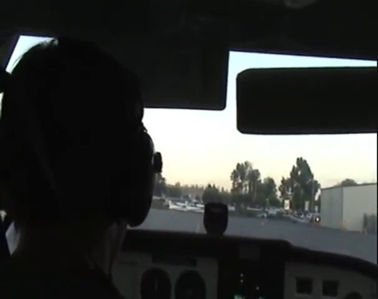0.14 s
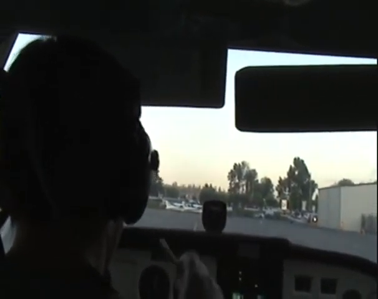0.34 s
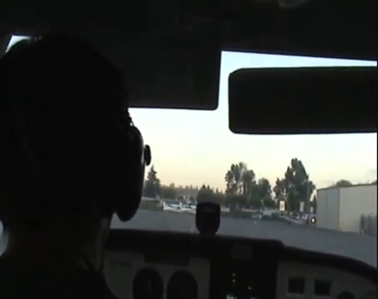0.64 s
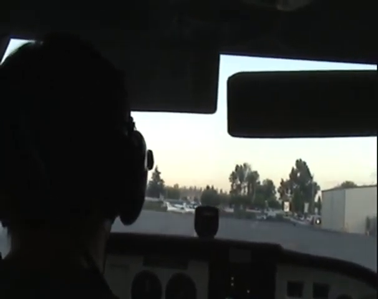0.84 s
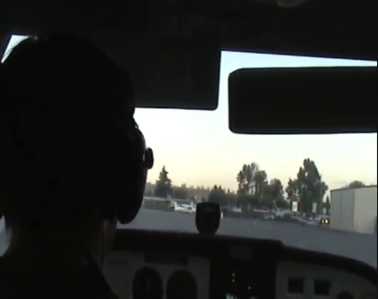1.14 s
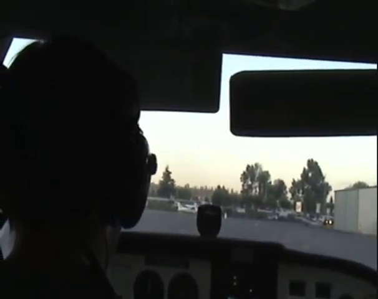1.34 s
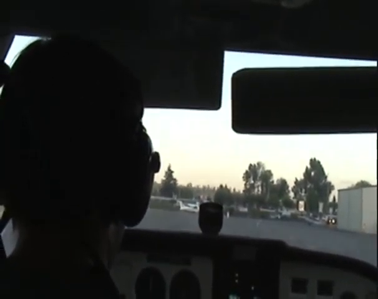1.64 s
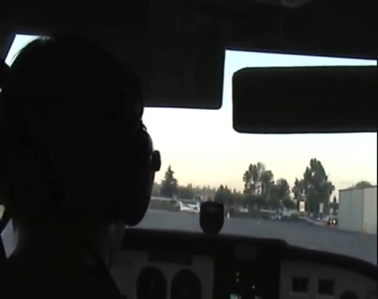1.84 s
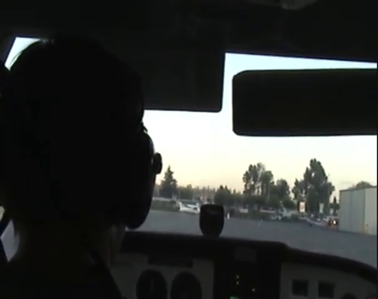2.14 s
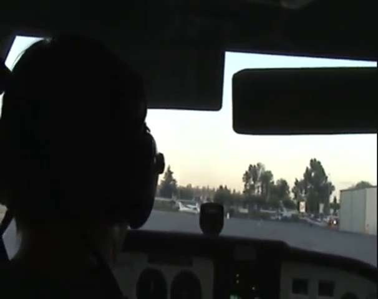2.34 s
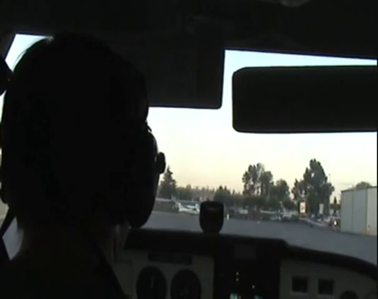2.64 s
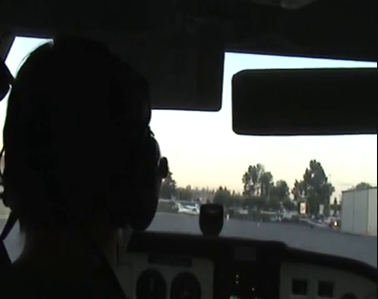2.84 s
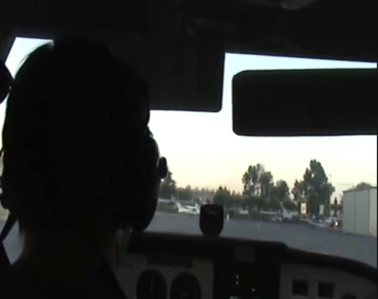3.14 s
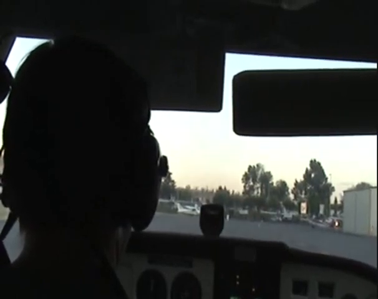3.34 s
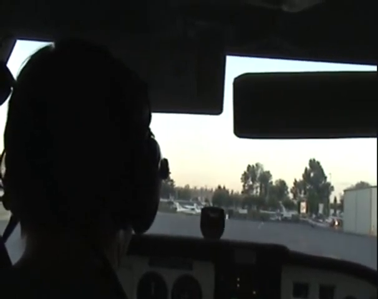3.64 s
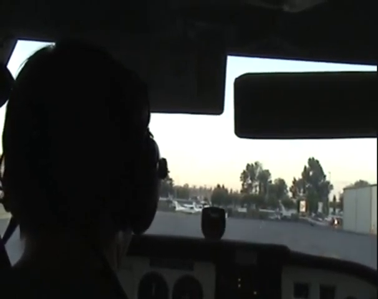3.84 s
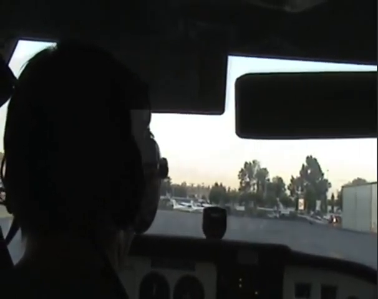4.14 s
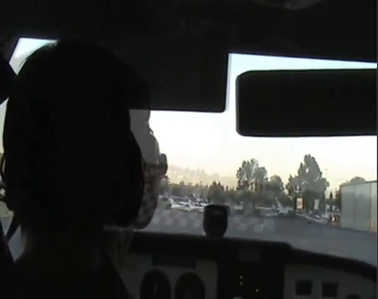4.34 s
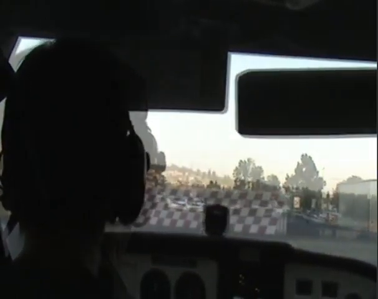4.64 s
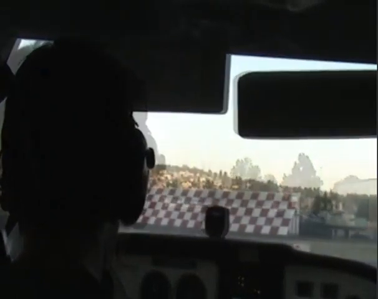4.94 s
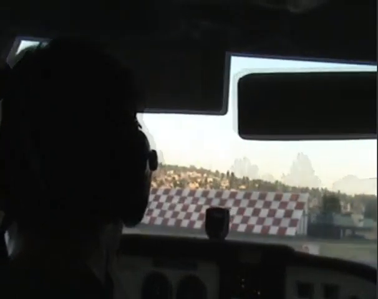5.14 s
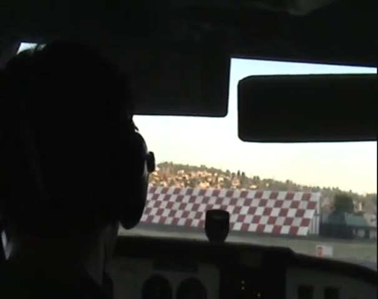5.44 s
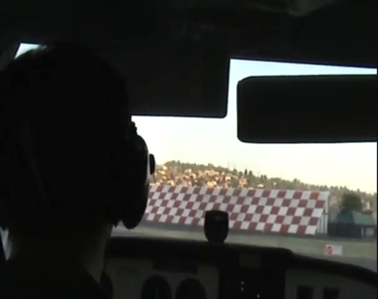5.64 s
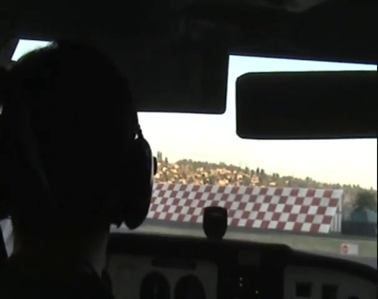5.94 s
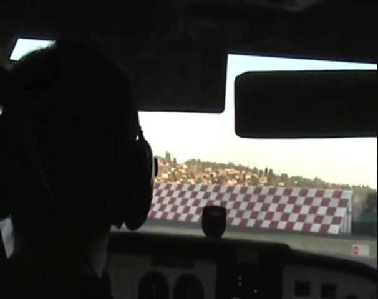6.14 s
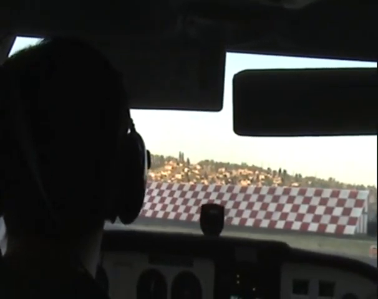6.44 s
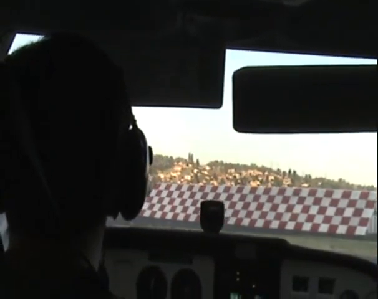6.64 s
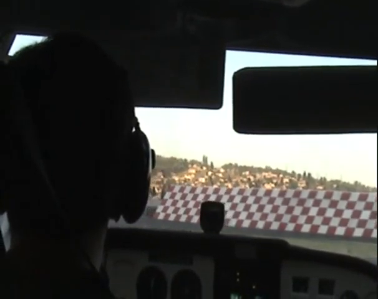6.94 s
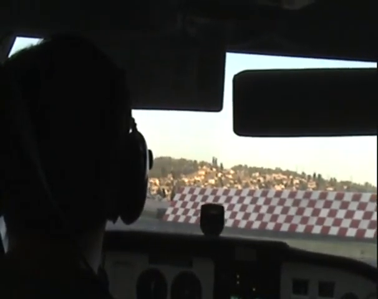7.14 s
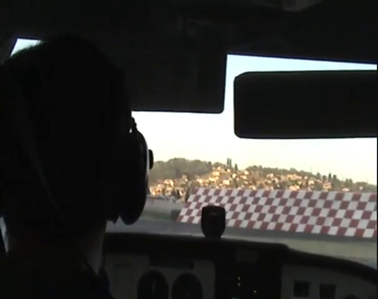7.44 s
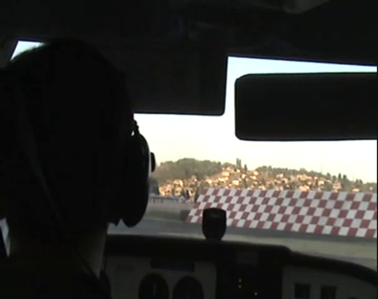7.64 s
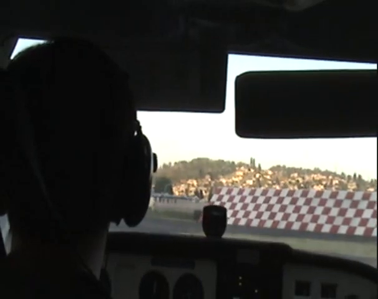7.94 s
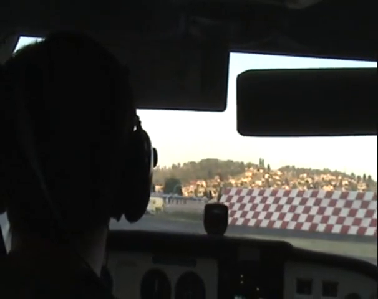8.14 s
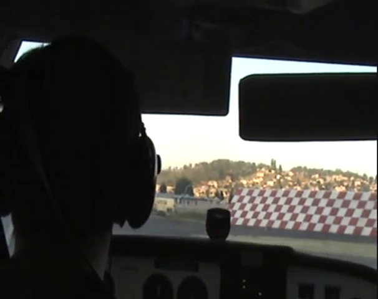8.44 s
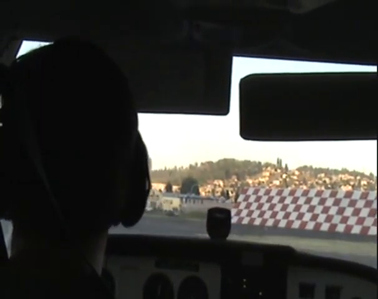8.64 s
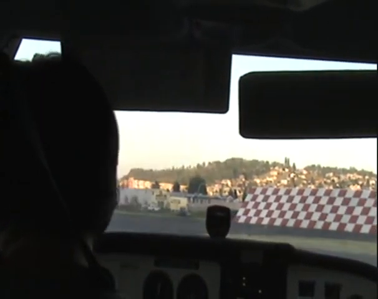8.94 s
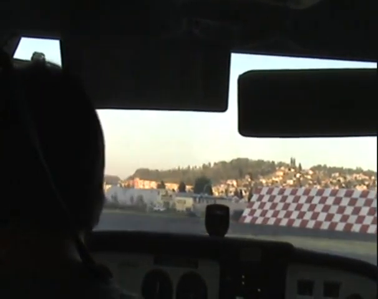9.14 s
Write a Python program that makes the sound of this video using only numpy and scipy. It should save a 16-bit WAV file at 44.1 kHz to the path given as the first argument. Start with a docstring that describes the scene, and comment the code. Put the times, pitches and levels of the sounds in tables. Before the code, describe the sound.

Heard from inside a small airplane cabin on the ground: a four-cylinder engine idles in a smooth low purr over muffled air noise, with faint ticking fittings and a few tiny squeaks. Just after four seconds it gradually dissolves into higher power, a deep lumpy throb with louder gusting propeller wash, a thin high whine and harder metallic clacks, continuing to the end without a fade.

```python
"""Inside the cabin of a small four-cylinder airplane on the ground. The engine first idles smoothly: summed
exhaust tones over shaped noise, with light fitting ticks and a few squeaks. From about 4 s it dissolves into
the engine at higher power: a lumpy beat, louder gusting propeller wash and a thin whine of steady tones.
One beat fails at about 6.5 s and one at about 9.1 s. Hard clacks, ringing noise bursts, fall throughout but
mostly at power; a few more sine squeaks follow."""
import sys
import numpy as np
from scipy import signal
from scipy.fft import rfft, irfft
from scipy.io import wavfile

SR = 44100
rng = np.random.default_rng(int(sys.argv[2]) if len(sys.argv) > 2 else 0)


def bounce(signal):
    """Save signal as a 16-bit WAV file at the path given by the first command-line argument."""
    frames = np.transpose(np.atleast_2d(signal))
    limited = np.clip(frames, -1, 1)
    pcm = np.round(limited * 32767).astype(np.int16)
    wavfile.write(sys.argv[1], SR, pcm)


N = 410130
TIME = np.arange(N) / SR
BINS = np.fft.rfftfreq(N, 1 / SR)


def amp(db):
    """Decibels to gain."""
    return 10 ** (np.asarray(db) / 20)


def evened(x):
    """Scales to rms 1."""
    return x / np.sqrt(np.mean(x ** 2) + 1e-20)


def curve(points):
    """Joins rows (s, value) by straight lines over time."""
    return np.interp(TIME, *np.transpose(points))


def spectrum(points):
    """Joins rows (Hz, value) on a log-frequency axis."""
    hz, value = np.transpose(points)
    return np.interp(np.log(BINS + 1), np.log(hz + 1), value)


def wander(rate_hz, size=16384):
    """Slow random signal of rms 1, low-passed around rate_hz."""
    hz = np.fft.rfftfreq(size, N / SR / size)
    lowpass = 1 / (1 + (hz / rate_hz) ** 4)
    slow = irfft(rfft(rng.standard_normal(size)) * lowpass)
    return np.interp(np.arange(N) * size / N, np.arange(size), evened(slow))


def add(mix, start_s, sound):
    """Adds a sound into the mix at a time."""
    part = mix[max(round(start_s * SR), 0):][:len(sound)]
    part += sound[:len(part)]


# Engine speed at idle. Each row: time in seconds, speed in revolutions per minute.
IDLE_RPM = [(0.0, 1286.8), (5.3, 1295.2)]
# Exhaust and propeller tones. Each row: multiple of the four-stroke cycle (4 = firing rate), nominal peak in dB.
IDLE_ORDERS = [(2, -46), (3, -40), (4, -26), (5, -46), (6, -64), (7, -44), (8, -20.5), (9, -60),
               (11, -47.5), (12, -22.5), (16, -36.5), (20, -48), (24, -47.5)]
# Roar through the cabin walls. Each row: frequency in Hz, relative spectral level in dB.
IDLE_ROAR = [(15, 4), (60, 10.5), (170, 7.5), (240, -1.5), (300, 0), (340, -3), (470, 0.5), (620, -0.5),
             (740, -9), (1300, -14), (2200, -20), (4000, -26.5), (7000, -30), (10800, -29.5),
             (15500, -41.5)]
# Cylinders. Each row: place in the cycle (0-1), relative knock in dB, puff of roar (0-1).
IDLE_CYLINDERS = [(.19, -1, 0.34), (.43, 3, 0.6), (.68, 2.5, 0), (.94, -1, 0.3)]


def idling():
    """Smooth four-cylinder beat, wash and light ticks at low engine speed."""
    cycles = crank(IDLE_RPM, start_cycles=.022)
    beat = exhaust(cycles, IDLE_ORDERS, uneven=0.02, blade=0.52, blade_lead_cycles=0.095)
    puffs = puffing(cycles, IDLE_CYLINDERS, lag_cycles=0.041)
    wash = roar(cycles, IDLE_ROAR, puffs, level_db=-34.5, throb=0.054, gust_db=0.92,
                flutter_db=0.87, machinery=0.63, ring=1.28)
    ticks = rattle(cycles, IDLE_CYLINDERS, level_db=-59.0, spread_db=2.5, decay_s=0.0023, tilt_db=-2.5)
    hits = loose_part(cycles, place=.42, top_db=-38, range_db=19, ring_hz=4810, scatter=0.063)
    return beat + wash + ticks + clacks(hits, level_db=-17, dry=.3)


# Engine speed under power. Each row: time in seconds, speed in revolutions per minute.
POWER_RPM = [(4.5, 1673.1), (5.3, 1721.5), (7.0, 1650.8), (7.5, 1671.5), (8.0, 1700.3), (8.7, 1682.0),
             (9.3, 1620.9)]
# Exhaust and propeller tones. Each row: multiple of the four-stroke cycle (4 = firing rate), nominal peak in dB.
POWER_ORDERS = [(2, -62), (3, -66), (4, -12), (5, -35), (6, -15), (7, -38), (8, -17), (10, -25),
                (12, -35.5), (14, -36.5)]
# Roar through the cabin walls. Each row: frequency in Hz, relative spectral level in dB.
POWER_ROAR = [(15, 4), (60, 14), (190, 1.5), (270, -1.5), (335, -5.5), (410, 1), (520, 0.5), (720, -7),
              (1300, -14.5), (2500, -22), (5000, -30), (7000, -32.5), (10800, -30.5), (15500, -41)]
# Cylinders. Each row: place in the cycle (0-1), relative knock in dB, puff of roar (0-1).
POWER_CYLINDERS = [(.16, -14, 0), (.41, -1.5, 0.2), (.65, -18, 0.16), (.9, 1.5, 0.06)]
WASH_DB_PER_RPM = 0.011  # a faster propeller blows harder


def powered(recovery=0.59, recovery_rpm=50, even_rpm=1675):
    """Strong and weak firings alternate; the strong ones shake the fittings most."""
    cycles = crank(POWER_RPM, start_cycles=-.054)
    excess_rpm = curve(POWER_RPM) - even_rpm
    # weak cylinders pull harder above even_rpm, less below it
    on_weak = np.sin(2 * np.pi * cycles) ** 2
    strength = (1 + recovery * on_weak * np.tanh(excess_rpm / recovery_rpm)) * misfire()
    beat = exhaust(cycles, POWER_ORDERS, uneven=0.035, blade=0.905, blade_lead_cycles=0.0424) * strength
    puffs = puffing(cycles, POWER_CYLINDERS, lag_cycles=0.064)
    wash = roar(cycles, POWER_ROAR, puffs, level_db=-25.0, throb=0.04, gust_db=0.83,
                flutter_db=1.5, machinery=0.47, ring=0.89)
    wash = wash * amp(WASH_DB_PER_RPM * excess_rpm)
    ticks = rattle(cycles, POWER_CYLINDERS, level_db=-49.0, spread_db=4.0, decay_s=0.0024, tilt_db=-4.5)
    hits = loose_part(cycles, place=0.33, top_db=-30, range_db=23, ring_hz=7160, scatter=0.103)
    knocks = clacks(hits, level_db=-20, dry=.3)
    return beat + wash + ticks + knocks + whine(level_db=0.5, drift_hz=4.44, flicker=0.42)


def crank(rpm, start_cycles):
    """Running count of four-stroke cycles; each takes two revolutions."""
    return np.cumsum(curve(rpm)) / (2 * 60 * SR) - start_cycles


def once_a_cycle(cycles, place):
    """Times in seconds at which the crank passes one place in its cycle."""
    return np.interp(np.arange(int(cycles[-1])) + place, cycles, TIME)


def exhaust(cycles, orders, uneven, blade, blade_lead_cycles):
    """Harmonics of the cycle; a blade thump ahead of each firing shifts phases, and strength wavers."""
    beat = np.zeros(N)
    for order, db in orders:
        turn = 2 * np.pi * round(order)
        passing = round(order) % 4 == 0  # two blades pass four times a cycle
        advance = np.angle(1 + passing * blade * np.exp(1j * turn * blade_lead_cycles))
        beat += amp(db) * np.cos(turn * cycles + advance)
    return beat * (1 + uneven * wander(47))


# Strong beats that fail. Each row: time in seconds, share of the beat lost at that time (0-1).
MISFIRES = [(6.53, 0.57), (9.110, 0.49)]


def misfire(length_s=0.014):
    """Gain on the exhaust beat: a Gaussian dip for each failed firing."""
    return 1 - sum(lost * np.exp(-((TIME - s) / length_s) ** 2) for s, lost in MISFIRES)


# Cabin and panel resonances. Each row: frequency in Hz, width in Hz, gain in dB before the ring factor.
CABIN = [(410, 37, 1.5), (510, 25, 1), (863, 80, 5), (956, 65, -1.5), (1121, 137, 7), (1188, 59, -6),
         (1410, 40, 0.5), (1636, 64, 3), (1870, 25, -0.5), (2120, 48, -0.5), (3820, 120, 3)]
# Stereo width. Each row: frequency in Hz, gain of the side signal in dB.
SIDE_GAIN = [(60, -12), (130, -13.5), (380, -21.5), (700, -17.5), (1300, -19), (2400, -15.5), (4400, -24.5),
             (8100, -9.5), (11000, -7.5), (15000, 2)]
# Stereo balance. Each row: frequency in Hz, left over right gain in dB.
LEFT_LEAN = [(350, 0.5), (700, .5), (2400, 0.4), (5000, -0.5), (9000, .9), (15000, 2)]


def roar(cycles, colour, puffs, level_db, throb, gust_db, flutter_db, machinery, ring,
         gust_low_hz=260, gust_top_hz=2600):
    """Turbulence and engine clatter swell at each firing and in gusts, coloured by the cabin."""
    swell = 1 + throb * np.cos(2 * np.pi * 4 * cycles)
    noise = rng.standard_normal((2, N))
    noise[0] += machinery * clatter(cycles)  # machinery is in the mid signal only
    air = noise * swell
    surge = evened(puffs * amp(gusting(gust_db) + flutter_db * wander(47)))
    # surges move the body of the roar, hardly its rumble or hiss
    body = BINS ** 2 / (BINS ** 2 + gust_low_hz ** 2) / (1 + (BINS / gust_top_hz) ** 2)
    mid, side = body * rfft(air * surge) + (1 - body) * rfft(air)
    side = side * amp(spectrum(SIDE_GAIN))
    ears = np.array([mid + side, mid - side]) * amp(np.outer([.5, -.5], spectrum(LEFT_LEAN)))
    cabin_db = ring * sum(db / (1 + (2 * (BINS - hz) / width) ** 2) for hz, width, db in CABIN)
    coloured = irfft(ears * amp(spectrum(colour) + cabin_db), N)
    return amp(level_db) * evened(coloured)


PUFF_CYCLES = 0.063  # Gaussian half length, to 1/e


def puffing(cycles, cylinders, lag_cycles):
    """Gain on the roar: each cylinder adds its own puff, a share of a cycle after its knock."""
    gain = 1
    for place, _, puff in cylinders:
        offset = (cycles - place - lag_cycles + .5) % 1 - .5
        gain = gain + puff * np.exp(-(offset / PUFF_CYCLES) ** 2)
    return gain


# Brief surges of propeller wash. Each row: time in seconds, relative level in dB.
SURGES = [(5.73, 3), (6.6, 2.5), (7.17, 2.2), (7.48, 3.5), (7.9, -0.2), (8.45, 1.5), (9.19, 4.5)]
SURGE_S, GUST_RATE_HZ = 0.054, 6.5  # Gaussian half length to 1/e, gust low-pass


def gusting(gust_db):
    """Relative wash level in dB: slow random gusts and a few brief surges."""
    surges_db = sum(db * np.exp(-((TIME - s) / SURGE_S) ** 2) for s, db in SURGES)
    return gust_db * wander(GUST_RATE_HZ) + surges_db


def clatter(cycles, size=4096):
    """Valves and gears: one stretch of noise repeated every cycle."""
    return evened(np.interp(cycles % 1, np.arange(size) / size, rng.standard_normal(size)))


def rattle(cycles, cylinders, level_db, spread_db, decay_s, tilt_db):
    """Each cylinder shakes the airframe and knocks its fittings once a cycle."""
    contacts = np.zeros(N)
    for place, knock_db, _ in cylinders:
        times = once_a_cycle(cycles, place)
        for s, (size, late) in zip(times, rng.standard_normal((len(times), 2))):
            hit_db = level_db + knock_db + spread_db * min(size, 1.5)
            add(contacts, s + 0.0016 * late, amp(hit_db) * chatter(decay_s))
    return fittings(contacts, tilt_db)


def chatter(decay_s, tail=0.29, tail_s=0.02):
    """Noise burst of rapid metal contacts with a short cabin echo."""
    t = np.arange(SR // 20) / SR
    strike = (t / decay_s) * np.exp(1 - t / decay_s)
    return rng.standard_normal(len(t)) * (strike + tail * np.exp(-t / tail_s))


# Resonances of the loose fittings. Each row: frequency in Hz, width in Hz, relative gain in dB before the tilt.
FITTINGS = [(5000, 94, -8), (6170, 6100, -6.5), (7270, 180, -1), (7650, 450, -11), (8700, 450, -6.5),
            (11000, 4000, -23)]


def fittings(contacts, tilt_db):
    """Contacts excite the resonances of the loose fittings; tilt_db is per octave, flat below 3 kHz."""
    ring = 0
    for hz, width, db in FITTINGS:
        ring = ring + amp(db) / (1 + 2j * (BINS - hz) / width) * BINS / (BINS + hz) * 2
    ring = ring * amp(tilt_db * np.log2(np.maximum(BINS, 3000) / 7000))
    return irfft(rfft(contacts) * ring / np.sqrt(np.mean(abs(ring) ** 2)), N)


def loose_part(cycles, place, top_db, range_db, ring_hz, scatter):
    """A part thrown once a revolution, mostly gently, at times hard: rows (s, nominal dB, ring Hz)."""
    times = np.append(once_a_cycle(cycles, place), once_a_cycle(cycles, place + .5))
    gentle, detune = rng.random((len(times), 2)).T
    hit_db = top_db - range_db * np.sqrt(gentle)
    return np.transpose([times, hit_db, ring_hz * (1 + scatter * detune ** 4)])


def clacks(hits, level_db=-12.0, decay_s=0.002, dry=0.63, ring_db=0, ring_s=0.0051):
    """Harder knocks: a bare click, the fittings at large, and one part that rings out."""
    contacts, rings, t = np.zeros(N), np.zeros(N), np.arange(SR // 20) / SR
    build_and_die = np.exp(-t / ring_s) - np.exp(-t / decay_s)
    for s, db, hz in hits:
        add(contacts, s, amp(db + level_db) * chatter(decay_s))
        add(rings, s, amp(db + ring_db) * build_and_die * np.sin(2 * np.pi * hz * t))
    return fittings(contacts, tilt_db=-2) + dry * contacts + rings


# Whine, likely of gyro instruments. Each row: frequency in Hz, rms level in dB before level_db and panning.
WHINE = [(3548, -63), (3628, -62.5), (3671, -63), (3973, -67), (4151, -66), (3870, -72)]


def whine(level_db, drift_hz, flicker):
    """High sines wavering in pitch and level, leaning alternately left and right."""
    out = np.zeros((2, N))
    for k, (hz, db) in enumerate(WHINE):
        phase = 2 * np.pi * np.cumsum(hz + drift_hz * wander(11.4)) / SR
        tone = (1 + flicker * wander(21)) * np.sin(phase)
        pan_db = (-1) ** k * 1.2 * np.array([1, -1])
        out += np.outer(amp(db + pan_db), tone)
    return amp(level_db) * np.sqrt(2) * out


# Thin squeaks. Each row: start in seconds, centre frequency in Hz, peak level in dB.
SQUEAKS = [(.85, 11100, -55), (.92, 11100, -54), (1.358, 2650, -53), (1.483, 2040, -53), (3.49, 11100, -54),
           (4.06, 5400, -57), (6.908, 14150, -47), (7.148, 14150, -42), (7.608, 11000, -44)]
SQUEAK_S = 0.044


def squeaks(waver_hz=45):
    """Brief, faint, high sines of unsteady pitch with smooth ends."""
    out, waver = np.zeros(N), waver_hz * wander(150)
    for s, hz, db in SQUEAKS:
        pitch = hz + waver[round(s * SR):][:round(SQUEAK_S * SR)]
        envelope = signal.windows.tukey(len(pitch), .7)
        add(out, s, amp(db) * envelope * np.sin(2 * np.pi * np.cumsum(pitch) / SR))
    return out


# Fade from idle to power. One row: start in seconds, end in seconds.
DISSOLVE = (4.145, 5.46)
# The loudest rattles. Each row: time in seconds, nominal level in dB, ring frequency in Hz.
CLACKS = [(2.4622, -41, 4930), (2.6468, -43, 4840), (4.7925, -40, 7220), (5.3531, -36, 7230),
          (5.4599, -37, 9060), (6.2002, -35, 7220), (6.4846, -36, 7160), (6.6292, -37, 7100),
          (6.9181, -35, 7160), (8.921, -36, 9400), (8.9619, -28.5, 7000), (9.215, -34, 7600)]


def scene():
    """Linear crossfade from idle to higher power, with clacks and squeaks throughout."""
    share = np.interp(TIME, DISSOLVE, [0, 1])
    return (1 - share) * idling() + share * powered() + clacks(CLACKS) + squeaks()


EDGE_HZ = 15750


def record(dry):
    """Steep linear-phase low-pass at EDGE_HZ."""
    lowpass = signal.firwin(511, EDGE_HZ, window=("kaiser", 9), fs=SR)
    return signal.oaconvolve(dry, lowpass[None], "same")


dry = scene()
out = record(dry)
bounce(out)
```